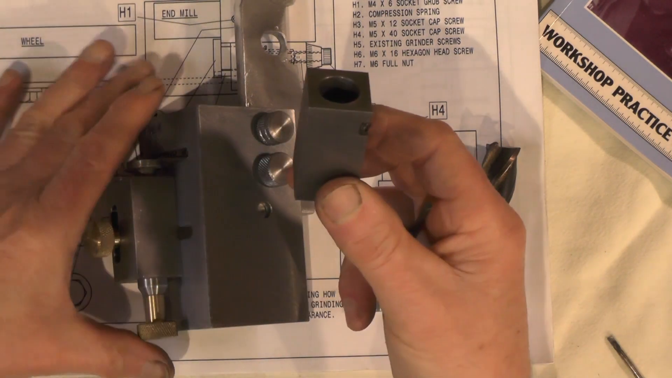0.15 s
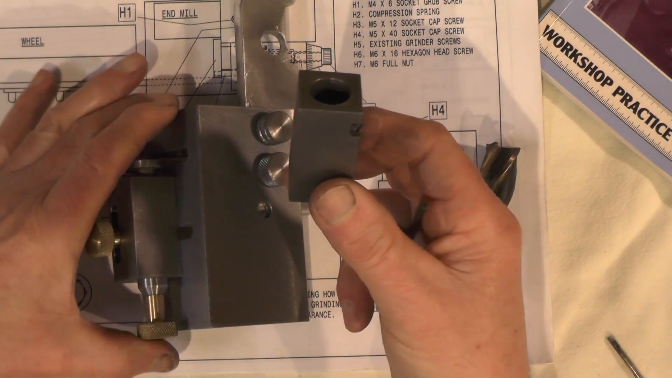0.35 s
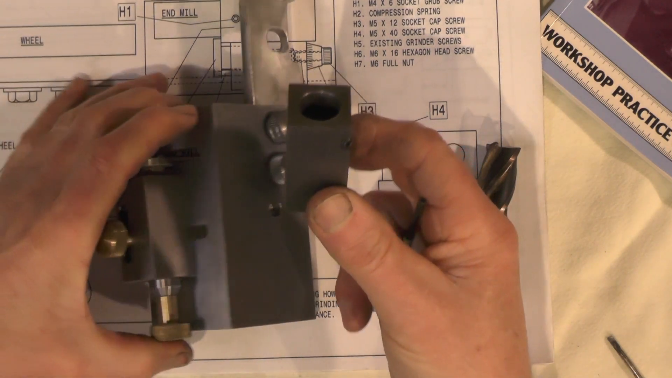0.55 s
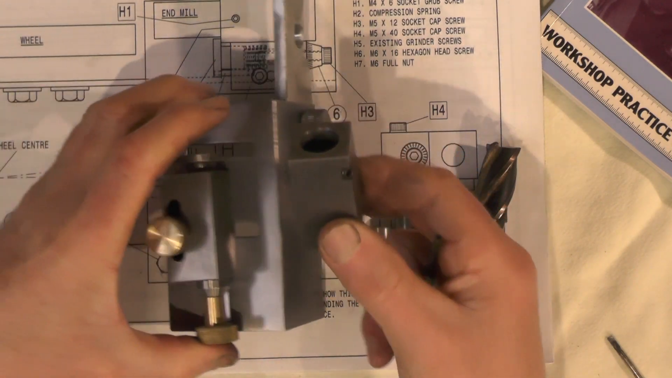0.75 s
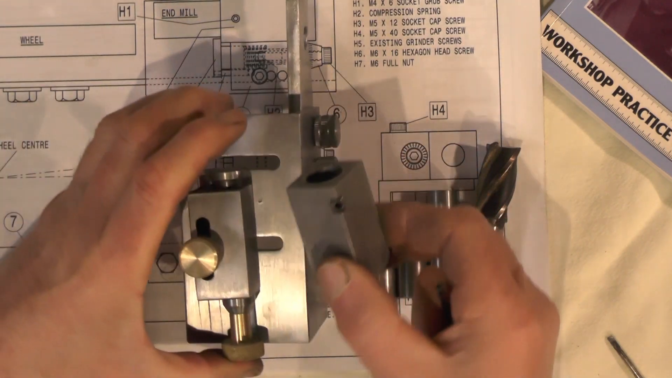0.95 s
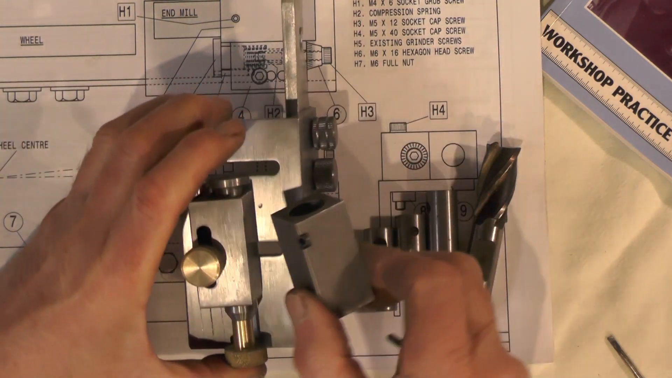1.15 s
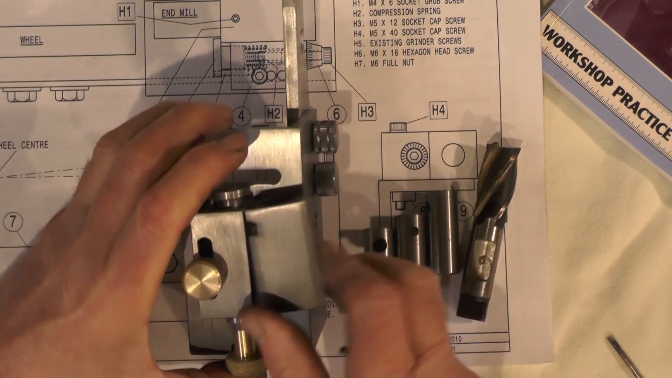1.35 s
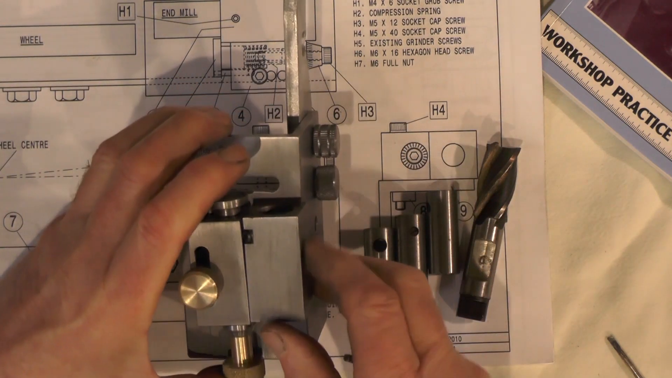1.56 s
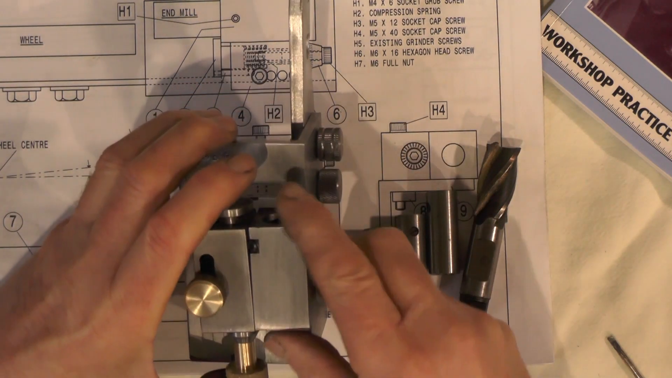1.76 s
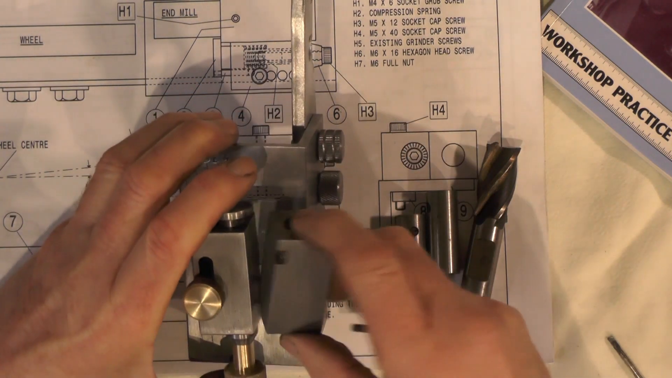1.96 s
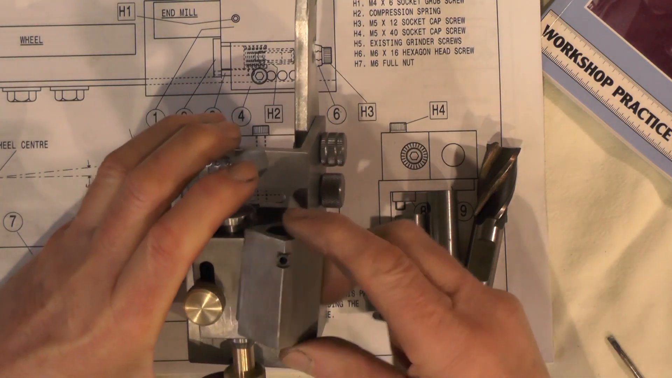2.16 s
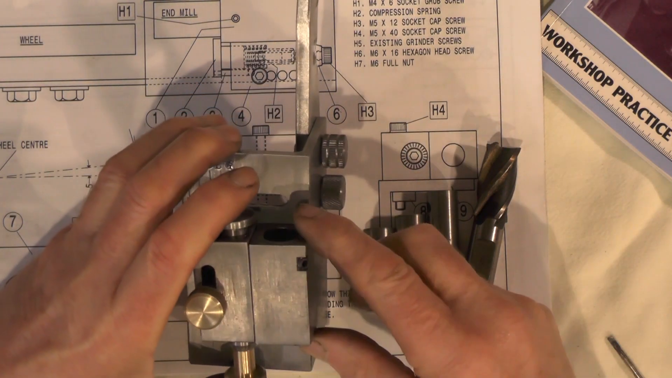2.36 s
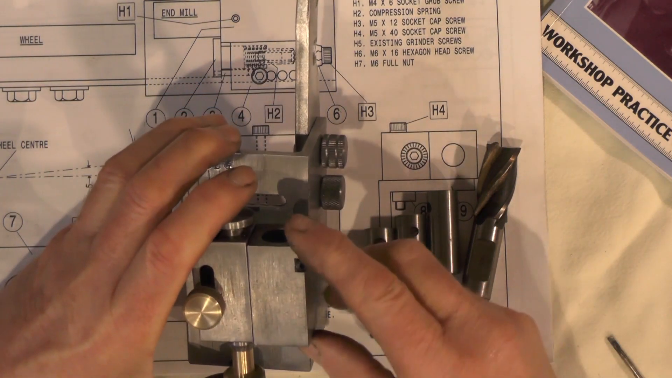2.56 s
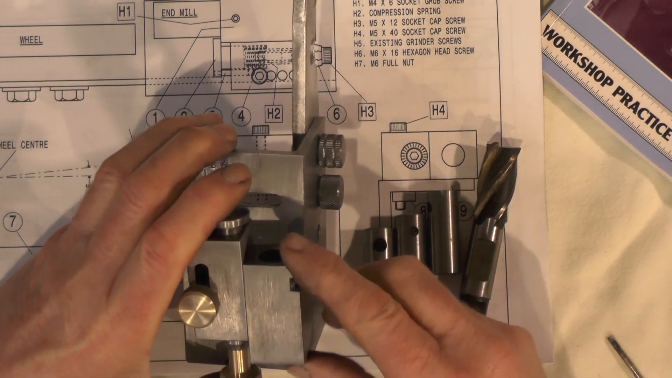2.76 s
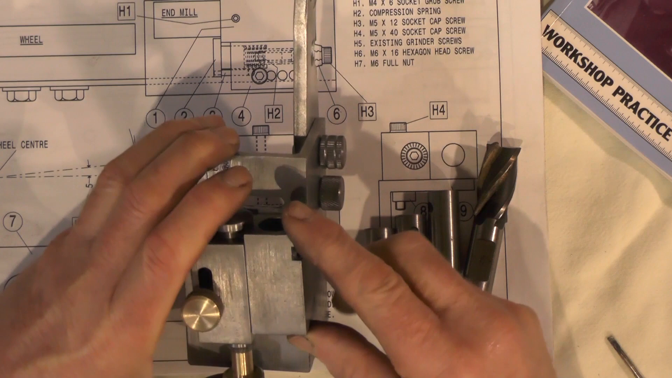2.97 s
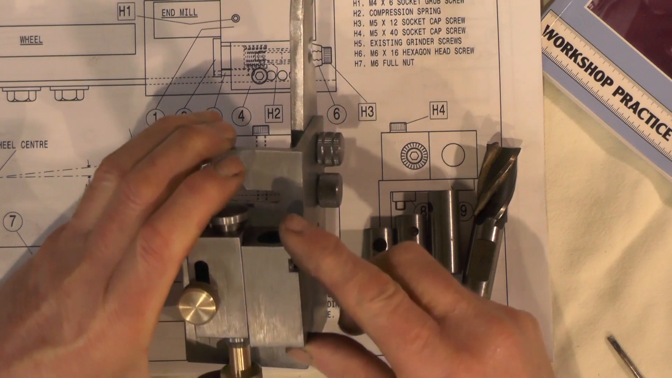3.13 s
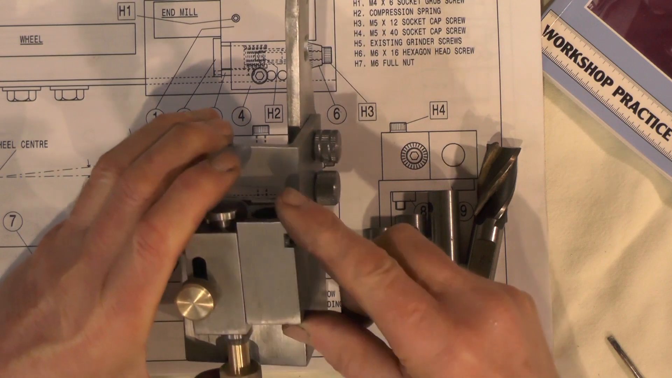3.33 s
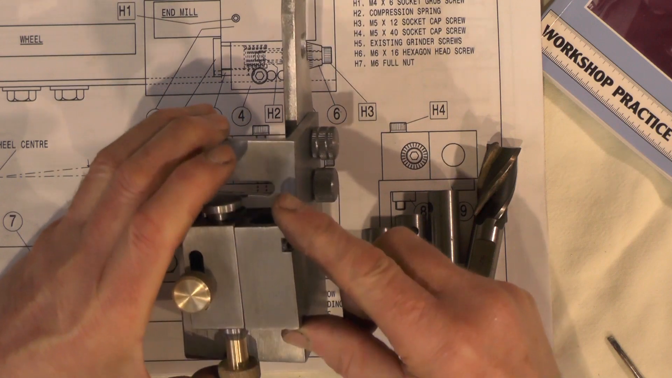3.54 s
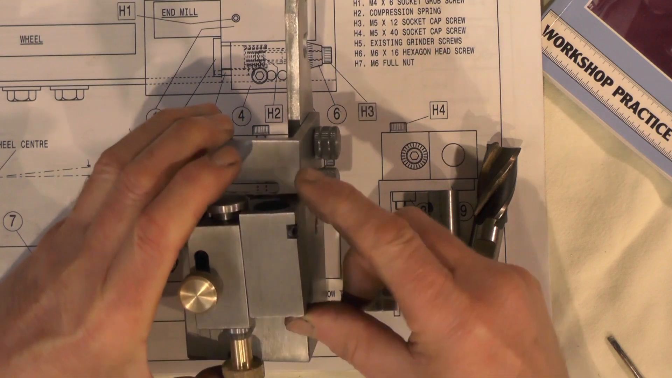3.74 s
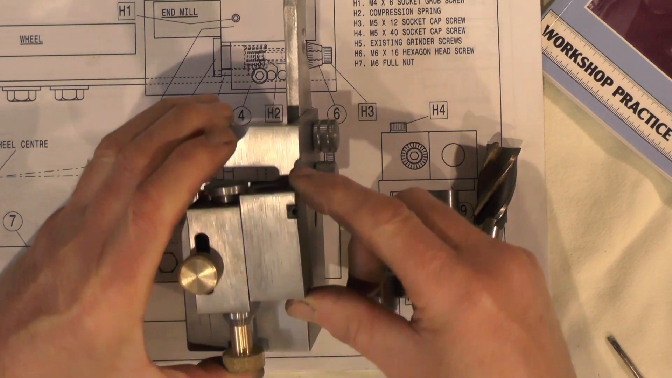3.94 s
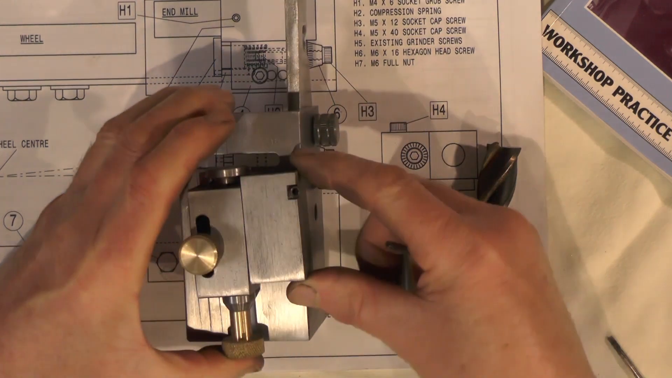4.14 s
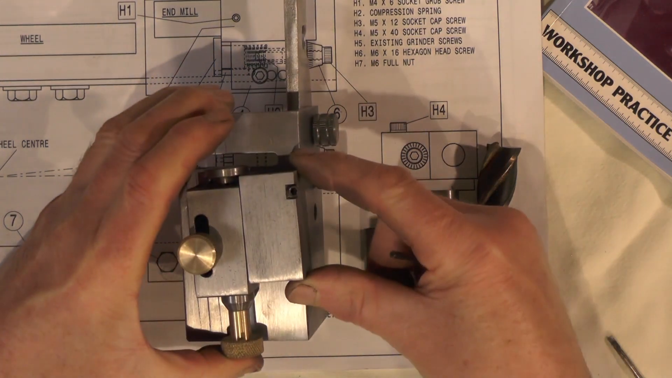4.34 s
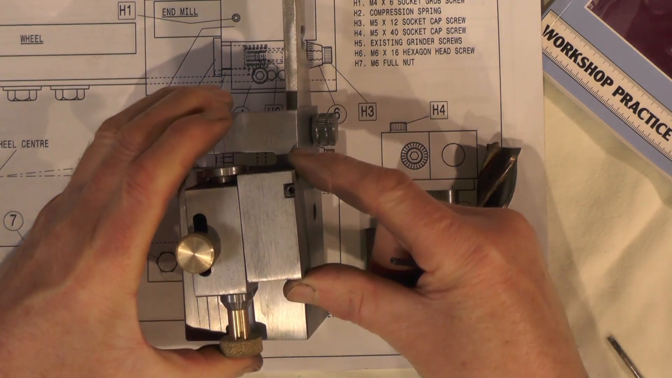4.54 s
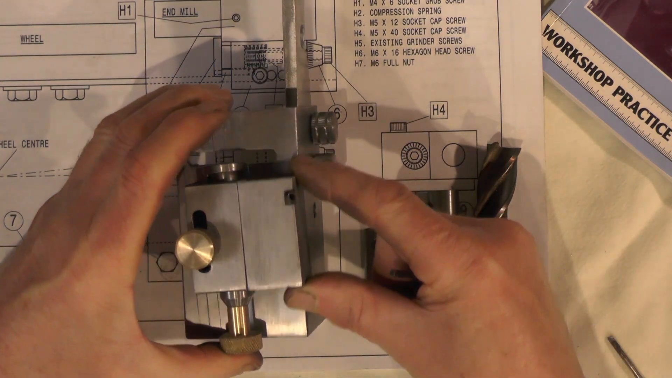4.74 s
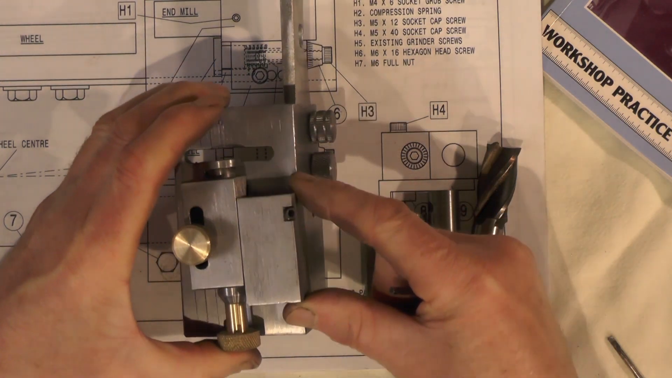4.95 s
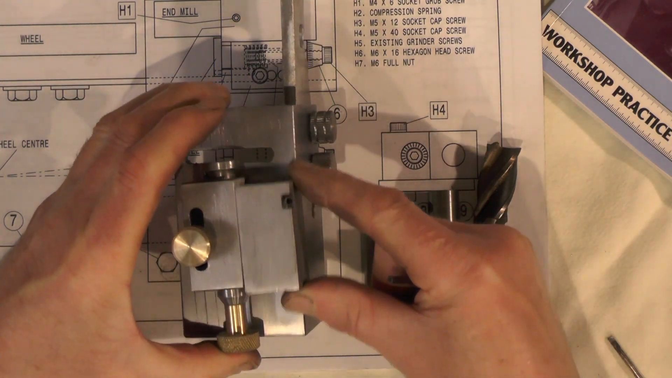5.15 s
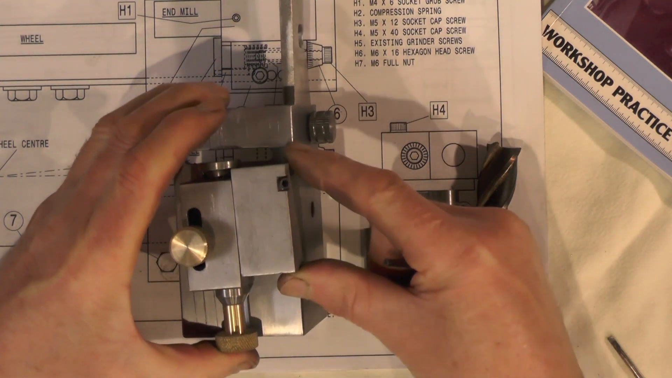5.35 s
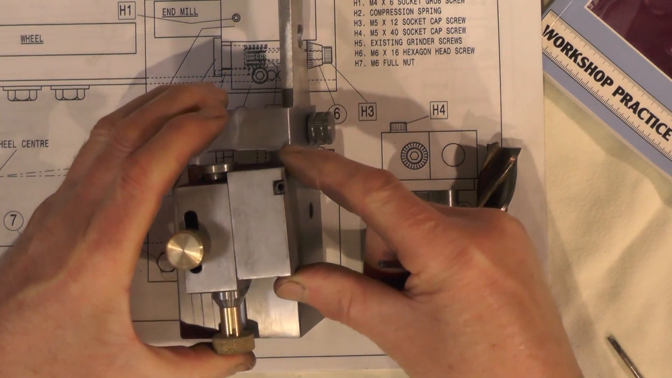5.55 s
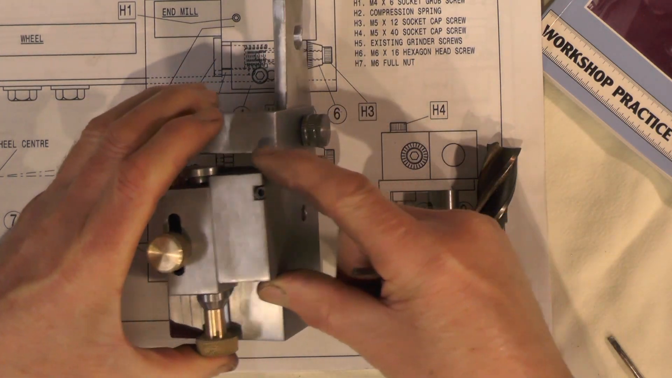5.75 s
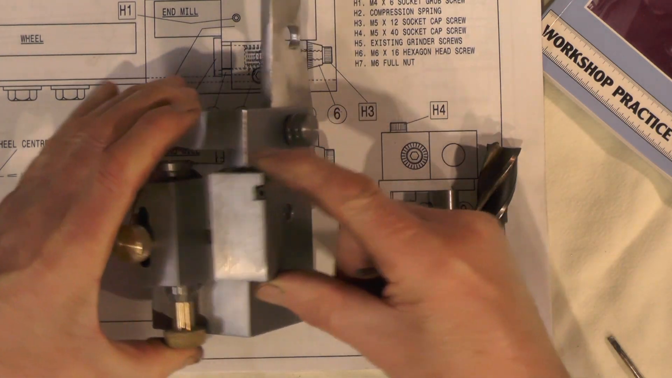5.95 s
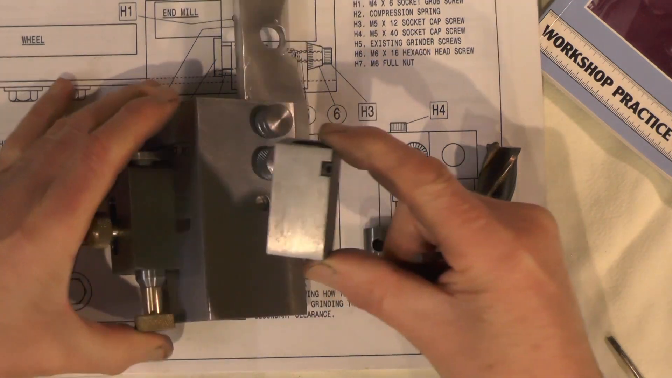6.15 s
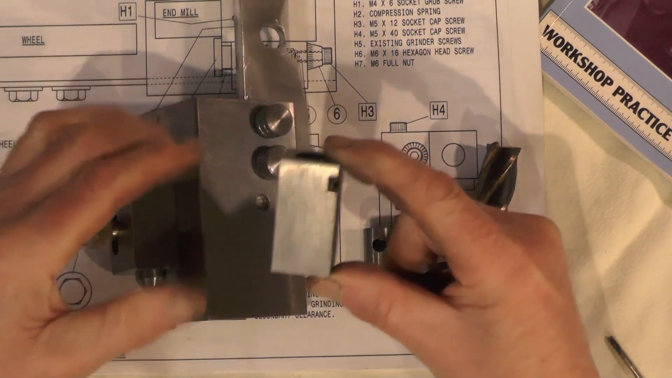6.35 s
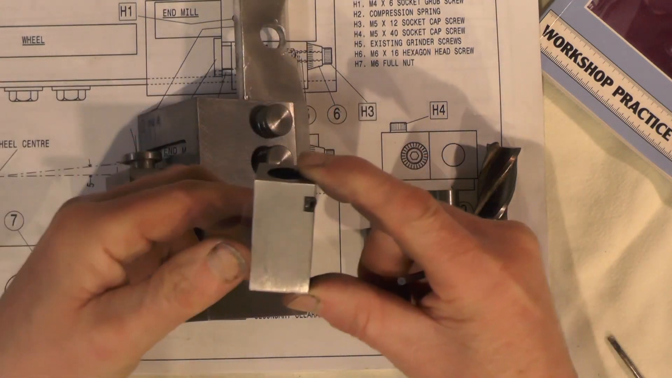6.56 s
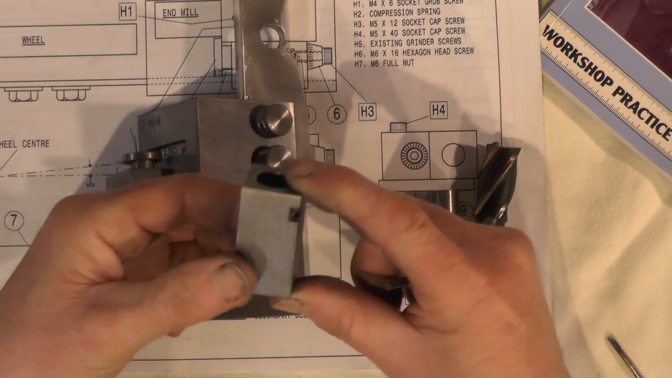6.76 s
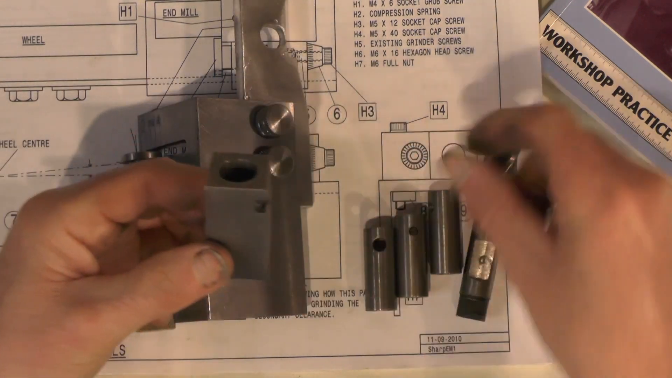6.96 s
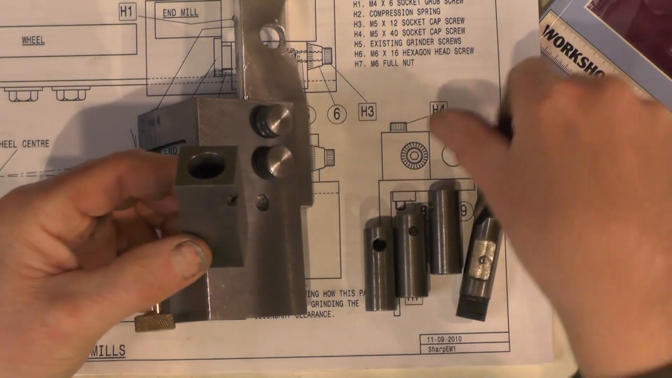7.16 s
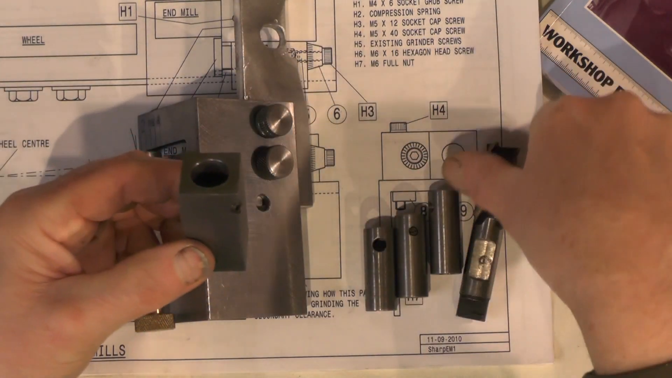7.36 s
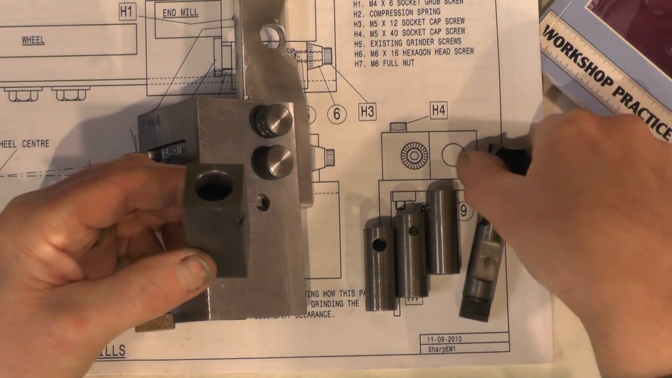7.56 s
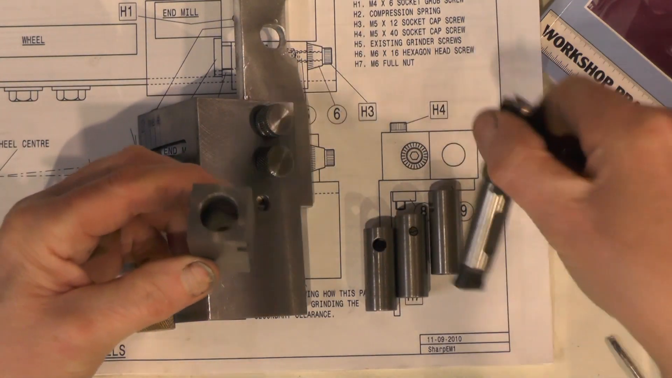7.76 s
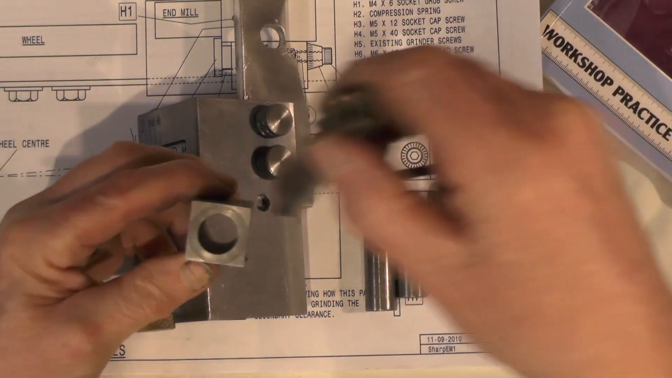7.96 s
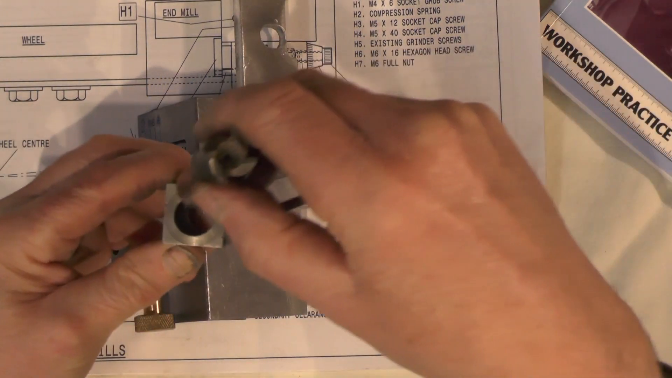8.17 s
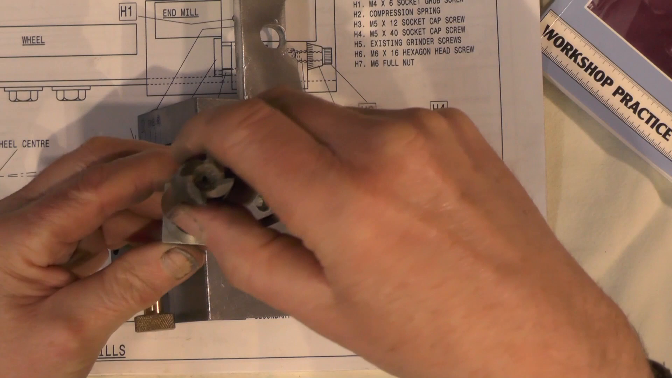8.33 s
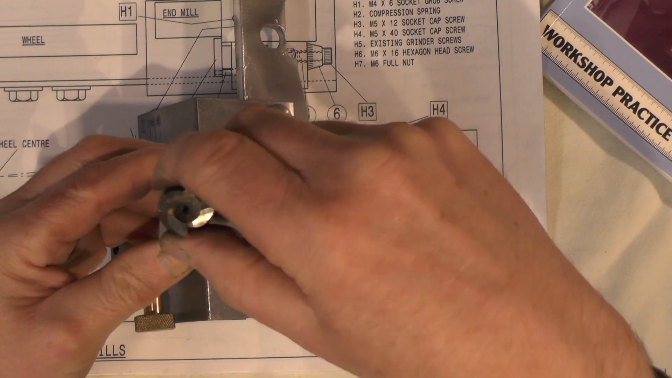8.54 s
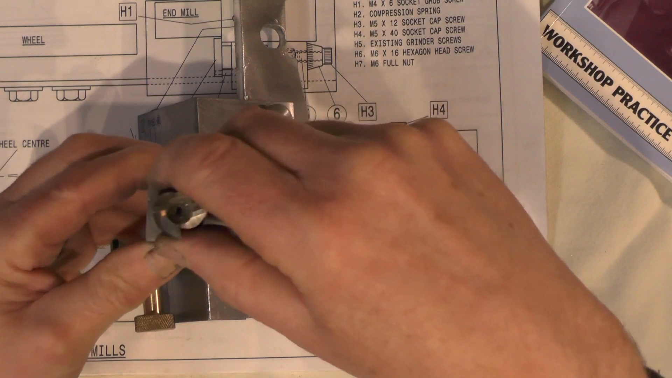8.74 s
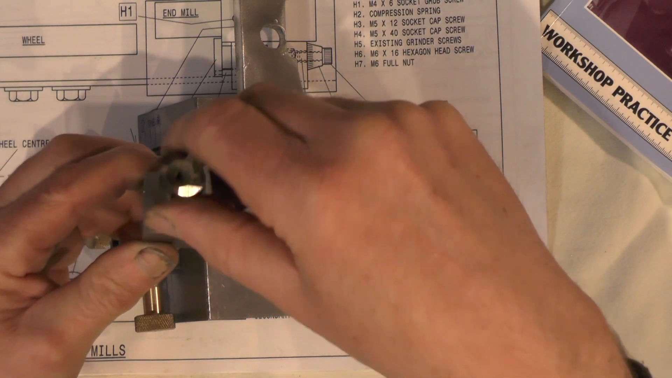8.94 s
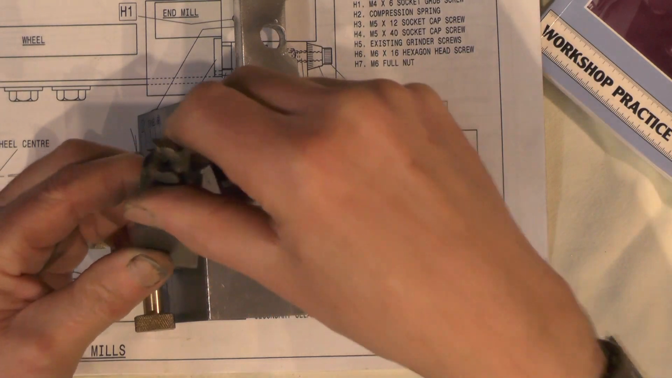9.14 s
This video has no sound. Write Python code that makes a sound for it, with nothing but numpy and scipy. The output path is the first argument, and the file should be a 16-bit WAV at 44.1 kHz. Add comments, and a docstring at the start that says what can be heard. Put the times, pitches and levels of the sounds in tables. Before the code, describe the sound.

Sharp metallic clicks and short scrapes close on the right over hum and hiss, ending in lighter ticks and a thin high squeak.

```python
"""Scrapes and hard clicks of a small steel block rocked and seated in a jig, over hum, hiss and a faint whirr.
Thuds follow as the jig is set down on a paper-covered bench; then a milling cutter ticks and squeaks in the bore.
Contacts are noise bursts plus struck modes, scrapes are streams of grains, squeaks are wavering tones.
All handling is nearer the right microphone, in a small workshop; loud clicks duck the recorder's gain."""
import sys
import numpy as np
from scipy import signal
from scipy.fft import rfft, irfft, next_fast_len
from scipy.io import wavfile
from scipy.ndimage import uniform_filter1d

SR = 44100
rng = np.random.default_rng(int(sys.argv[2]) if len(sys.argv) > 2 else 0)


def persist_wave(psi):
    """Save psi, clipped to +-1, as 16-bit WAV."""
    counts = np.round(np.clip(psi, -1, 1) * 32767).astype(np.int16)
    wavfile.write(sys.argv[1], SR, np.atleast_2d(counts).T)


N = 410130
T = np.arange(N) / SR
BLOW = T[:SR // 2]  # time base of one event, s


def undb(db):
    """Decibels to gain."""
    return 10 ** (np.asarray(db) / 20)


def unit(x):
    """Scale to rms 1."""
    return x / np.sqrt(np.mean(x ** 2))


def blow_unit(x):
    """Scale a transient to the energy of 10 ms at rms 1."""
    return x / np.sqrt(np.sum(x ** 2) / (SR / 100))


def curve(rows):
    """Gain over time from (t/s, level/dB) rows."""
    return undb(np.interp(T, *np.transpose(rows)))


def lookup(x, rows):
    """Interpolate a two-column table, holding its end values."""
    return np.interp(x, *np.transpose(rows))


def colour(points):
    """Gain against frequency from (f/Hz, level/dB) points, interpolated over log frequency."""
    hz, db = np.transpose(points)
    return lambda f: undb(np.interp(np.log(f + 1), np.log(hz), db))


def peak(hz, width_hz):
    """Gain against frequency of one resonance; half gain at width_hz either side."""
    return lambda f: 1 / (1 + ((f - hz) / width_hz) ** 2)


def shape(x, gain):
    """Filter by a gain against frequency."""
    size = next_fast_len(len(x))
    spectrum = rfft(x, size) * gain(np.fft.rfftfreq(size, 1 / SR))
    return irfft(spectrum, size)[:len(x)]


def noise(size, gain):
    """Coloured noise of rms 1."""
    return unit(shape(rng.standard_normal(size), gain))


def fade(t60_s):
    """Exponential decay over the length of a blow."""
    return np.exp(-np.log(1000) * BLOW / max(t60_s, 1e-3))


def onset(attack_s):
    """Exponential rise from zero."""
    return 1 - np.exp(-BLOW / attack_s)


def ring(hz, t60_s):
    """One struck mode at a random phase."""
    return np.sin(2 * np.pi * (hz * BLOW + rng.random())) * fade(t60_s)


def add(out, s, x):
    """Mix x into out from time s."""
    i = int(s * SR)
    x, i = x[max(-i, 0):], max(i, 0)
    out[i:i + len(x)] += x[:max(N - i, 0)]


# room air and hiss per channel: f/Hz, relative level/dB
AIR_LEFT = [(25, -17), (70, 3.5), (130, 4.5), (330, 2.5), (700, -3), (1400, -13), (2200, -15.5),
            (3300, -16), (5800, -21.5), (8800, -13.5), (15500, -14)]
AIR_RIGHT = [(25, -20), (70, 8), (130, 4.5), (330, 3), (700, -5.5), (1400, 0), (2300, -5.5), (3200, 0.5),
             (4500, -8), (7600, -13), (11500, -4), (15500, -6.5)]
# small motor's whirr: f/Hz, full width/Hz, level/dB (right channel)
WHIRR = [(309, 40, -70), (754, 82, -72.5), (1155, 35, -73.5), (1380, 58, -68), (1640, 15, -78),
         (1876, 6.3, -73), (1915, 34, -73.5), (3080, 15, -73.5), (3280, 75, -68)]
# low hum that stops half way; fainter, higher hum that comes up late: t/s, level/dB
HUM = [(0, -58.5), (1.6, -64.5), (4.65, -65.5), (4.95, -91)]
LATE_HUM = [(6, -87), (9.1, -63.5), (9.25, -88)]


def background(shared_hz=230, whirr_left_db=-7, flicker_db=0.26, waver_hz=0.7):
    """Room air, hiss and whirr as shaped noise, hums as wavering sines; the air's bass is shared by both ears."""
    common = shape(rng.standard_normal(N), lambda f: (shared_hz / (f + shared_hz / 2)) ** 2)
    whirr_level = np.linalg.norm(undb([row[2] for row in WHIRR]))

    def whirr_gain(f):
        return sum(undb(db) / np.sqrt(width) * peak(hz, width / 2)(f) for hz, width, db in WHIRR)

    def ear(points, air_db, whirr_db):
        def even(f):
            # offsets the bass added by the shared part
            return colour(points)(f) / np.sqrt(1 + (shared_hz / (f + shared_hz / 2)) ** 4)
        air = unit(shape(common + rng.standard_normal(N), even))
        air = air * undb(flicker_db * noise(N, peak(0, 18)))
        whirr = whirr_level * noise(N, whirr_gain)
        return undb(air_db) * air + undb(whirr_db) * whirr

    def hum(hz):
        wavering_hz = hz + waver_hz * noise(N, peak(0, 5.6))
        return np.sqrt(2) * np.sin(2 * np.pi * np.cumsum(wavering_hz) / SR)

    ears = np.array([ear(AIR_LEFT, -59.5, whirr_left_db), ear(AIR_RIGHT, -54.5, 0)])
    return ears + hum(79.5) * curve(HUM) + hum(139.5) * curve(LATE_HUM)


def workshop(x, wet_db, early_db, t60_s=0.3, treble_t60_s=0.3, early_t60_s=0.034, bass_hz=160):
    """Quick reflections off the bench and tools, then a short room tail."""
    low = noise(len(BLOW), peak(0, 7000)) * fade(t60_s)
    high = noise(len(BLOW), peak(8600, 4000)) * fade(treble_t60_s)
    tail = (low + 0.5 * high) * onset(0.005)
    early = rng.standard_normal(len(BLOW)) * fade(early_t60_s) * (BLOW > 0.0007)
    response = undb(wet_db) * tail / np.linalg.norm(tail) + undb(early_db) * early / np.linalg.norm(early)
    reflected = signal.fftconvolve(x, response)[:N]
    # long waves bend round the small things on the bench and come back weaker
    return shape(reflected, lambda f: f / np.hypot(f, bass_hz))


# t/s, level/dB
WHISTLES = [(2.36, -58), (7.87, -57)]


def whistles(start_hz=14800, fall_hz_per_s=9500, width_hz=300, attack_s=0.025, t60_s=1.0):
    """A thin band of hiss slides down from the top of the treble as it fades."""
    out = np.zeros(N)
    glide = np.sqrt(2) * np.sin(2 * np.pi * np.cumsum(start_hz - fall_hz_per_s * BLOW) / SR)
    for s, db in WHISTLES:
        hiss = glide * noise(len(BLOW), peak(0, width_hz))
        add(out, s, undb(db) * hiss * fade(t60_s) * onset(attack_s))
    return out


# rub spectrum: f/Hz, relative level/dB
RUB_COLOUR = [(150, -6), (400, -4), (800, 4), (1300, 1.5), (2200, -3), (4500, 2), (6000, -4), (8000, -12.5),
              (15000, -9)]
# grip shifts: hold start/s, hold end/s, level/dB
RUBS = [(0.237, 0.853, -52.5), (6.16, 6.58, -54), (7.89, 7.935, -53.5)]


def fingers(rise_db_per_s=50, fall_db_per_s=50, resting_db=-67.5, flutter_db=0.64):
    """Skin hisses over steel and paper: each shift of grip swells, holds and dies back to the resting touch."""
    effort = undb(resting_db)
    for start, end, db in RUBS:
        envelope_db = np.minimum(rise_db_per_s * (T - start), fall_db_per_s * (end - T))
        effort = np.maximum(effort, undb(db + np.minimum(envelope_db, 0)))
    flutter = undb(flutter_db * noise(N, peak(0, 39)))
    return noise(N, colour(RUB_COLOUR)) * effort * flutter


# blows that reach the bench: t/s, level/dB, f/Hz, t60/s
THUDS = [(1.4287, -30, 56.4, 0.081), (1.429, -29, 126, 0.047), (5.6306, -46.6, 341, 0.2),
         (6.1388, -32, 135, 0.12), (6.146, -40.5, 103, 0.28), (6.1557, -35, 660, .036),
         (9.21, -62, 44.9, .7)]


def thuds(rows=THUDS, dull_db=-8, attack_s=0.00027):
    """The bench top gives under the weight and swings a few times."""
    out = np.zeros(N)
    for s, db, hz, t60_s in rows:
        swing = np.sin(2 * np.pi * hz * BLOW) + undb(dull_db) * noise(len(BLOW), peak(hz, 0.43 * hz))
        motion = swing * fade(t60_s) * onset(attack_s)
        # the air follows the change of the motion: little sound far below the swing
        pressure = np.gradient(motion) * SR / (2 * np.pi * hz)
        add(out, s, undb(db) * np.sqrt(2) * pressure)
    return out


def contact(corner_hz, body_db, body_hz, body_width_hz):
    """A soft contact loses treble; a flat one knocks the whole body."""
    return lambda f: undb(body_db * peak(body_hz, body_width_hz)(f)) / np.sqrt(1 + (f / corner_hz) ** 4)


# dense, quickly damped part of a contact: f/Hz, relative level/dB
CRACK = [(30, -45), (120, -16), (280, -15.5), (550, -14.5), (850, -7), (1200, 2), (2500, -4), (3400, 7.5),
         (5000, 0.5), (6700, 4.5), (8600, -1.5), (11000, 2), (13200, 1.5), (15500, -12.5)]
# block and jig pressed together: f/Hz, full width/Hz, relative level/dB
PRESSED = [(248, 83, 7), (1290, 220, -13.5), (1920, 35, -26), (2410, 220, -1.5), (3320, 66, -7),
           (3544, 27, -7), (4680, 150, -11), (5750, 51, -20), (7030, 25, 0.5), (7220, 51, -30)]


def slides(rows, corner_hz, singing_db, modes_db, body_db=3, body_hz=1800, body_width_hz=900, judder_db=2.0):
    """Fine machining marks catch on each other: a juddering stream of tiny contacts rings the joined parts."""
    out, t = np.zeros(N), BLOW - BLOW[-1] / 2
    touch = contact(corner_hz, body_db, body_hz, body_width_hz)

    def steel(f):
        modes = sum(undb(db) * peak(hz, width / 2)(f) for hz, width, db in PRESSED)
        return colour(CRACK)(f) * (1 + undb(modes_db) * modes)

    for s, half_s, db, singing_hz in rows:
        grains = rng.laplace(size=len(t)) * undb(judder_db * noise(len(t), peak(0, 74)))
        scrape = unit(shape(shape(grains, steel), touch))
        singing = unit(shape(grains, peak(singing_hz, 0.03 * singing_hz)))
        push = np.exp(-(t / half_s) ** 2)
        add(out, s + t[0], undb(db) * unit(scrape + undb(singing_db) * singing) * push)
    return out


def strikes(rows, modes, knock, modes_db, seat_hz, seat_db, seat_t60_s, after_db, after_t60_s,
            body_hz, body_width_hz, snap_db=1, snap_t60_s=0.013, shimmer_db=-12, shimmer_t60_s=0.18,
            scatter_db=3.0, seat_spread=0.00094, attack_s=0.00014):
    """Faces chatter for a few ms as they meet; the steel rings on, with one note set by how the part is seated."""
    out = np.zeros(N)
    for s, db, corner_hz, t60_s in rows:
        touch = contact(corner_hz, lookup(corner_hz, knock), body_hz, body_width_hz)
        snap_and_chatter = fade(t60_s) + undb(snap_db) * fade(snap_t60_s)
        crack = blow_unit(noise(len(BLOW), colour(CRACK)) * snap_and_chatter)
        # screws, spring and slide add a crowd of high modes too close to tell apart
        shimmer = blow_unit(noise(len(BLOW), peak(5560, 4800)) * fade(shimmer_t60_s))
        # each point of contact favours other modes
        rings = blow_unit(sum(undb(mode_db + scatter_db * rng.standard_normal()) * ring(hz, mode_t60_s)
                              for hz, mode_db, mode_t60_s in modes))
        hit = blow_unit(shape(crack + undb(shimmer_db) * shimmer + undb(modes_db) * rings, touch))
        # the joint soaks up the strong first swings of the note; a weaker part lingers
        note_hz = seat_hz * (1 + seat_spread * rng.standard_normal())
        note = ring(note_hz, after_t60_s) * (fade(seat_t60_s) + undb(after_db))
        hit = hit + undb(seat_db) * blow_unit(note)
        hit = hit * onset(attack_s) * (BLOW < BLOW[-1] * 0.9)
        add(out, s, undb(db) * blow_unit(hit))
    return out


# flutes catch and sing: t/s, swell sigma/s, f/Hz, level/dB
SQUEAKS = [(8.8834, .0047, 9085, -24.5), (8.903, 0.0018, 9360, -42), (8.924, 0.012, 9170, -59),
           (8.962, .0045, 9610, -50), (9.12, 0.0035, 9160, -43.5), (9.145, 0.051, 9320, -58.5),
           (9.176, .0095, 9560, -48)]
# lighter catch, grittier squeak: level/dB, roughness (0-1)
SQUEAK_GRIT = [(-52, 0.9), (-43, 0.07)]


def squeaks(waver_hz=25, rough_width_hz=130):
    """Stick and slip pump the cutter's high mode: a firm catch gives a clean chirp, a light one a gritty one."""
    out, t = np.zeros(N), BLOW - BLOW[-1] / 2
    for s, swell_s, hz, db in SQUEAKS:
        rough = np.clip(lookup(db, SQUEAK_GRIT), 0, 1)
        phase = 2 * np.pi * np.cumsum(hz + waver_hz * noise(len(t), peak(0, 120))) / SR
        clean = np.sqrt(2 * (1 - rough ** 2)) * np.sin(phase)
        grit = rough * noise(len(t), peak(hz, rough_width_hz))
        add(out, s + t[0], undb(db) * (clean + grit) * np.exp(-(t / swell_s) ** 2 / 2))
    return out


# cutter against bore: t/s, level/dB, contact corner f/Hz, clatter t60/s
TICKS = [(8.2879, -32, 3120, 0.011), (8.441, -53, 3300, .035), (8.6155, -41, 5500, 0.017),
         (8.6215, -35, 5500, 0.019), (8.6335, -36, 5500, 0.07), (8.769, -46.5, 3050, 0.037),
         (8.856, -55, 3480, .03), (8.876, -30.5, 6940, 0.041), (8.901, -45, 5000, 0.15),
         (9.143, -43, 4570, 0.055)]
# cutter modes: f/Hz, relative level/dB, t60/s
CUTTER = [(1160, -8, 0.023), (2250, -1.5, 0.017), (3250, 5.5, 0.016), (4870, 1, 0.029), (5180, 2, 0.017),
          (7000, -26, .1), (9200, -16, 0.045), (9190, 4.5, 0.054), (9560, 4, 0.046), (9370, -4, .05)]
# dull contacts knock the body more: contact corner f/Hz, body gain/dB
CUTTER_KNOCK = [(3300, 14), (5400, -8.5)]


def cutter_ticks():
    """The cutter taps the bore, ringing its modes and a high note."""
    return strikes(TICKS, CUTTER, CUTTER_KNOCK, modes_db=-0.5, seat_hz=9400, seat_db=-8.5, seat_t60_s=0.027,
                   after_db=-19, after_t60_s=0.19, seat_spread=0.012, body_hz=1290, body_width_hz=1100)


# steel-on-steel slides: t of hardest push/s, 1/e half length/s, level/dB, singing f/Hz
SLIDES = [(.118, .015, -49.5, 1680), (.157, 0.022, -45.5, 3820), (1.385, .04, -40, 3980),
          (1.902, 0.015, -37.5, 1883), (1.965, 0.051, -39.5, 1863), (2.29, .05, -33.5, 3180),
          (4.08, .1, -54.5, 3260), (6.986, 0.042, -43, 3290), (7.665, 0.028, -55, 4130),
          (8.608, 0.018, -50, 3030), (8.737, 0.017, -48.5, 9500), (9.02, 0.028, -55.5, 9500),
          (9.14, 0.057, -47, 2950)]


def steel_slides():
    """Short scrapes of steel on steel, each singing at its own pitch."""
    return slides(SLIDES, corner_hz=3930, singing_db=-5.5, modes_db=9)


# jig and block modes: f/Hz, relative level/dB, t60/s
STEEL = [(267, -16.5, 0.1), (1148, -17, 0.15), (1355, -13.5, 0.064), (1566, -17, 0.023), (2100, -23, 0.048),
         (2400, 2, 0.023), (2894, 7, 0.018), (3240, -5.5, 0.098), (3600, -14, 0.067), (3690, -4.5, 0.076),
         (4100, 0.5, 0.031), (4560, 6, 0.028), (5830, -5, 0.091), (5850, -18, 0.11), (6210, -5.5, 0.09),
         (6540, -3, 0.074), (8140, -18, 0.18), (9000, -8, .07), (10780, -1, .07), (11200, -14, .06)]
# loose block knocks jig: t/s, level/dB, contact corner f/Hz, clatter t60/s
CLICKS = [(1.3062, -32, 5940, 0.12), (1.3154, -12, 11500, .013), (1.3171, -13.5, 10000, 0.023),
          (1.4188, -13.5, 10040, 0.047), (1.4292, -11, 12600, .026), (1.777, -49, 3460, 0.036),
          (2.3012, -18.5, 9000, 0.089), (2.3085, -13, 9200, 0.1), (2.3265, -14, 9100, 0.047),
          (4.001, -43.5, 4640, 0.081), (6.112, -47.5, 4000, 0.029), (6.139, -41, 1680, 0.024),
          (6.1475, -41, 15000, 0.0089), (6.1556, -34.5, 3500, .03), (6.925, -47, 5500, 0.017)]
# dull contacts knock the body more: contact corner f/Hz, body gain/dB
BLOCK_KNOCK = [(3500, 12), (5000, 1), (11000, -5.5)]


def loose_clicks():
    """The loose block knocks against the jig, leaving a low note ringing."""
    return strikes(CLICKS, STEEL, BLOCK_KNOCK, modes_db=-8, seat_hz=1128, seat_db=-21, seat_t60_s=0.11,
                   after_db=-2, after_t60_s=0.21, body_hz=1390, body_width_hz=770,
                   snap_db=-7.5, snap_t60_s=0.021, shimmer_db=-15, shimmer_t60_s=0.15)


# block tipped back, slid shut, clicked home: click t/s, click level/dB, contact corner f/Hz,
# tip-back lead/s, tipping scrape level/dB, closing scrape level/dB, singing f/Hz
SEATINGS = [(2.1644, -16, 3690, .14, -29.5, -66, 3230), (2.9093, -17, 8040, 0.22, -46, -41.5, 1880),
            (3.2682, -16.5, 10100, 0.17, -47.5, -45.5, 1884),
            (3.641, -16.5, 9900, .163, -50.5, -46.5, 1920), (5.2607, -20.5, 4100, 0.46, -46, -43, 1366)]
# contact corner f/Hz, body gain/dB
SEATED_KNOCK = [(3500, 12), (4100, -0.5), (8500, 7.5)]


def seatings(clatter_t60_s=0.029, bench_db=-19, bench_hz=190, bench_t60_s=0.057,
             hard_contact_hz=9700, bump_db_per_octave=12):
    """The block scrapes back, scrapes shut and clicks home, ringing its seated note and bumping the bench."""
    strokes, clicks, bumps = [], [], []
    for s, db, corner_hz, lead_s, tipping_db, closing_db, singing_hz in SEATINGS:
        # further tipped, longer stroke; the closing one is hardest just before the click
        half_s = 0.027 + 0.087 * lead_s
        strokes.append((s - lead_s, half_s, tipping_db, singing_hz))
        strokes.append((s - 0.5 * half_s, half_s, closing_db, singing_hz))
        clicks.append((s, db, corner_hz, clatter_t60_s))
        # the harder the contact, the more of the blow reaches the bench
        hardness_octaves = np.log2(corner_hz / hard_contact_hz)
        bumps.append((s, db + bench_db + bump_db_per_octave * hardness_octaves, bench_hz, bench_t60_s))
    home = strikes(clicks, STEEL, SEATED_KNOCK, modes_db=-6, seat_hz=3496, seat_db=-1.5, seat_t60_s=0.033,
                   after_db=-17, after_t60_s=0.25, body_hz=2000, body_width_hz=770,
                   snap_db=-7, snap_t60_s=0.024, shimmer_db=-12.5, shimmer_t60_s=0.13)
    return home + thuds(bumps) + slides(strokes, corner_hz=3870, singing_db=-4, modes_db=12, body_db=0.5)


# left microphone's direct gain relative to the right: f/Hz, gain/dB
SHADE = [(120, 0), (500, -24), (1100, -11.5), (2200, -14.5), (4000, -15), (7500, -18.5), (9100, -1),
         (10500, -6), (14000, -4.5)]


def scene():
    """All handling happens at one spot, right of centre, over the background."""
    cutter = cutter_ticks() + squeaks()
    block = steel_slides() + loose_clicks() + seatings()
    bench = whistles() + fingers() + thuds() + cutter + block
    left = shape(bench, colour(SHADE)) + workshop(bench, wet_db=-28.5, early_db=-14.5)
    right = bench + workshop(bench, wet_db=-16.5, early_db=-10.5)
    return background() + np.array([left, right])


def gain_control(x, ceiling_db=-24, detector_s=0.0099, recovery_db_per_s=2):
    """Gain drops to hold the louder channel's short-term rms under the ceiling, then climbs back steadily."""
    power = uniform_filter1d(np.max(x ** 2, axis=0), int(detector_s * SR))
    over_db = np.maximum(10 * np.log10(np.abs(power) + 1e-18) - ceiling_db, 0)
    recovered_db = recovery_db_per_s * T
    cut_db = np.maximum.accumulate(over_db + recovered_db) - recovered_db
    return x * undb(-cut_db)


def record(dry, top_hz=15900):
    """The recorder rides its gain and cuts the top with a steep low-pass."""
    low_pass = signal.ellip(10, 0.2, 70, top_hz, fs=SR, output="sos")
    return signal.sosfilt(low_pass, gain_control(dry))


dry = scene()
out = record(dry)
persist_wave(out)
```